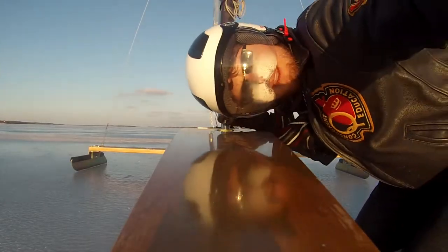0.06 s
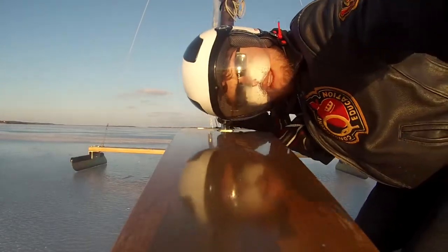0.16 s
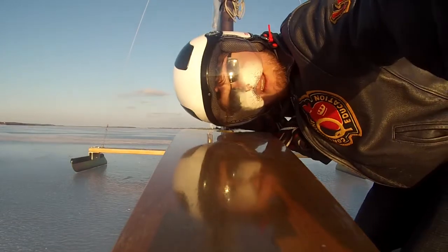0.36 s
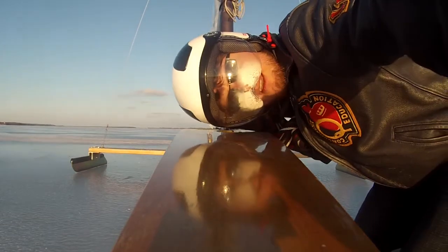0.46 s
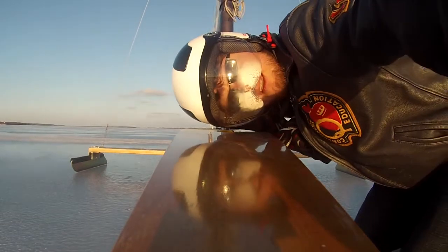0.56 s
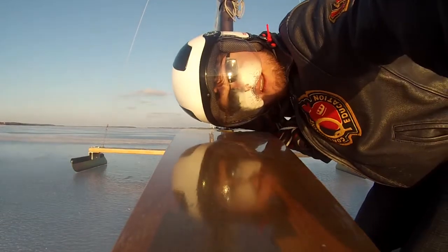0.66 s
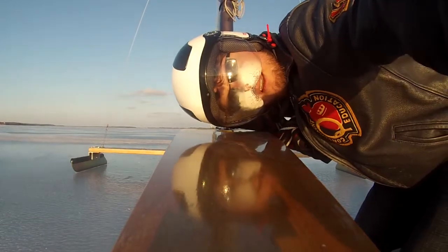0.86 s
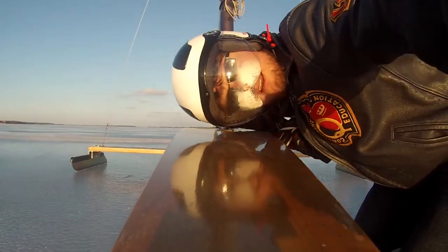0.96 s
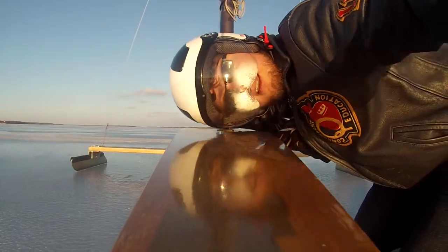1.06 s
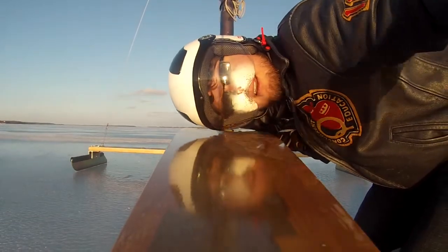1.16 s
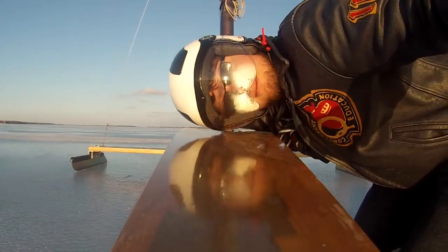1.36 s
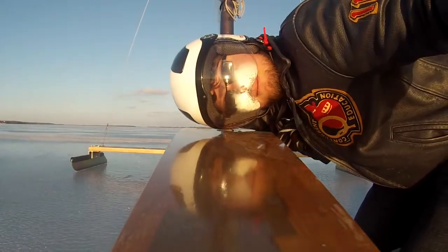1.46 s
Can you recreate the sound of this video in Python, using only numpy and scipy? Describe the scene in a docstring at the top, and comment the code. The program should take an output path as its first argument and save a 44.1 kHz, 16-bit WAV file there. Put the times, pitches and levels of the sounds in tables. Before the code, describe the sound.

Close to the deck of an ice boat on a frozen lake, a sharp knock sets the hull booming. Something slides in brief scrapes, then a second knock lands, over a low, uneven wind rumble and faint hiss.

```python
"""Ice boat on a frozen lake

Handling gives two sharp knocks that set the hollow hull booming in its lowest modes.
Something slides on the boat in a few short scrapes, each a dense train of frictional slips.
A low hull rumble, stirred by wind and a scrape, swells and fades under a faint, flickering hiss."""
import sys
import numpy as np
from scipy import signal
from scipy.fft import rfft, irfft, next_fast_len
from scipy.io import wavfile
from scipy.ndimage import uniform_filter1d, map_coordinates

SR = 44100
rng = np.random.default_rng(int(sys.argv[2]) if len(sys.argv) > 2 else 0)


def log_audio(samples):
    """Write samples as a 16-bit WAV file to the path given in sys.argv[1]."""
    # one column per channel
    frames = np.atleast_2d(samples).T
    # limit to full scale, then quantise
    limited = np.clip(frames, -1, 1)
    pcm = np.round(limited * 32767).astype(np.int16)
    wavfile.write(sys.argv[1], SR, pcm)


N = 66150


def amp(db):
    """Decibel scale: a level as an amplitude ratio."""
    return 10 ** (np.asarray(db) / 20)


def unit(x):
    """Normalisation to rms 1."""
    return x / np.sqrt(np.mean(x ** 2) + 1e-20)


def since(s):
    """Causality: seconds since a moment, zero before it."""
    return np.maximum(np.arange(N) / SR - s, 0)


def along(points, hz):
    """Interpolation of (frequency [Hz], value) points on a log frequency axis."""
    f, v = np.transpose(points)
    return np.interp(np.log(hz + 1), np.log(f + 1), v)


def wobble(rate):
    """Random modulation: a smooth curve with rate knots a second."""
    return map_coordinates(rng.standard_normal(int(N * rate / SR) + 4), [np.arange(N) * rate / SR])


def filtered(x, response):
    """Linear filtering: the spectrum of x times a frequency response."""
    m = next_fast_len(N + SR // 2)
    return irfft(rfft(x, m) * response(np.fft.rfftfreq(m, 1 / SR)), m)[:N]


def noise(spectrum):
    """Spectral shaping: coloured noise of rms 1."""
    return unit(filtered(rng.standard_normal(N), lambda hz: amp(along(spectrum, hz))))


def ring(t, hz, t60, rise):
    """Damped oscillation of one mode."""
    return np.sin(2 * np.pi * hz * t) * amp(-60 * t / t60) * (1 - np.exp(-t / rise))


def scrapes():
    """Stick-slip friction: dense random impulses drive the resonances of the rubbed part."""
    # (start [s], length [s], level [dB], fade over the stroke [dB], tilt [dB/octave], grit [dB],
    #  release T60 [s])
    strokes = [(0.0, 0.013, -45.5, 2.5, -6.5, -14, 0.16), (0.201, 0.07, -31.5, 6, 0.5, -8, 0.15),
               (0.276, .035, -40.5, 2.5, -0.5, -4, 0.26), (0.376, 0.086, -45.5, -0.5, -2, -9.5, 0.14),
               (0.515, 0.067, -39.5, -1, -3.5, -5, 0.12), (0.985, .053, -23, 7.5, 0, -5, 0.038)]
    # resonances of the rubbed part (frequency [Hz], bandwidth [Hz], peak gain [dB])
    modes = [(846, 59, -13.5), (1490, 330, -4.5), (1970, 205, 3.5), (2330, 200, -1.5), (3200, 230, -18.5),
             (3540, 164, -13), (4880, 110, -11), (6410, 450, -26)]
    # broadband friction noise (frequency [Hz], relative level [dB])
    grit_spectrum = [(100, 9), (400, -3), (1100, -1), (3000, 3.5), (4500, -4.5), (6500, -9.5),
                     (7600, -22.5), (10000, -20), (12000, -64)]
    rise_s, slips_per_s, slip_scatter, roughness_db = 0.012, 9000, 0.35, 0.7

    def resonances(f):
        """Damped resonators add with alternating polarity."""
        return sum((-1) ** k * amp(db) * 1j * f * width / (hz * hz - f * f + 1j * f * width)
                   for k, (hz, width, db) in enumerate(modes))

    out = np.zeros(N)
    for start, length, db, fade_db, tilt, grit_db, release_t60 in strokes:
        t = since(start)
        slips = (rng.random(N) < slips_per_s / SR) * rng.choice([-1, 1], N)
        strengths = np.exp(slip_scatter * rng.standard_normal(N))
        rub = unit(filtered(slips * strengths, resonances)) + amp(grit_db) * noise(grit_spectrum)
        rub = unit(filtered(rub, lambda hz: amp(tilt * np.log2(np.maximum(hz, 200)))))
        stroke_db = db - fade_db * np.minimum(t / length, 1)
        release_db = -60 * since(start + length) / release_t60
        level_db = stroke_db + release_db + roughness_db * wobble(130)
        out += rub * amp(level_db) * (1 - np.exp(-t / rise_s))
    return out


def rumble_and_air():
    """Forced vibration: wind and a scrape stir a low hull rumble under a nearly steady hiss of air."""
    # swelling and fading of the rumble (time [s], level [dB])
    rumble_swells = [(0, -33.5), (0.109, -41.5), (0.179, -30.5), (.3, -24.5), (.36, -35.5), (.4, -25.5),
                     (.49, -31.5), (0.539, -24), (.6, -23), (0.649, -34.5), (0.709, -28), (0.851, -39),
                     (.96, -32.5), (1.15, -33), (1.331, -38), (1.44, -40.5), (1.5, -27.5)]
    # hull rumble, peaking at the lowest resonance (frequency [Hz], relative level [dB])
    rumble_spectrum = [(10, -25), (25, -2), (38, 0.5), (53, 8.5), (64, -7), (85, -12.5), (110, -28.5),
                       (133, -24), (170, -28), (260, -42.5), (500, -69)]
    # moving air (frequency [Hz], relative level [dB])
    air_spectrum = [(30, 7.5), (200, 2), (350, 3), (600, -3), (850, -2.5), (1050, -12), (1350, 3),
                    (1650, 1.5), (2000, -6), (3000, -13), (4000, -18.5), (6000, -18.5), (7500, -24),
                    (11500, -27.5), (12300, -49)]
    air_db, sway_db, flutter_db = -55.5, -0.22, 0.74
    rumble = noise(rumble_spectrum)
    # dividing by the running rms leaves the swells to set the level
    running_rms = np.sqrt(np.abs(uniform_filter1d(rumble ** 2, size=2600)) + 1e-6)
    swell_gain = amp(np.interp(since(0), *np.transpose(rumble_swells)))
    hiss = amp(air_db + sway_db * wobble(4) + flutter_db * wobble(33)) * noise(air_spectrum)
    return swell_gain * rumble / running_rms + hiss


def treble_flicker():
    """Amplitude modulation: brief Gaussian swells make a very faint treble hiss come and go."""
    # treble hiss (frequency [Hz], relative level [dB])
    hiss_spectrum = [(1500, -44), (3000, 6), (4500, -10.5), (6000, 0), (7500, -12.5), (9500, 2),
                     (10700, -27), (11600, 1), (12300, -40)]
    # peaks of the swells (time [s], level [dB])
    swells = [(0.074, -67), (.17, -68.5), (.68, -65), (.775, -64.5), (0.804, -65.5), (.88, -65.5),
              (1.07, -66), (1.18, -68), (1.28, -66), (1.309, -65), (1.37, -66)]
    width_s = 0.012
    t = since(0)
    envelope = sum(amp(db) * np.exp(-((t - peak) / width_s) ** 2) for peak, db in swells)
    return envelope * noise(hiss_spectrum)


def knocks():
    """Impact excitation: each contact gives a click of damped modes, a noisy crack and a hollow ring."""
    # the first knock strikes twice in quick succession; the last contact is a scrape coming to a stop
    # (time [s], click [dB], pitch [ratio], rise [s], tilt [dB/octave], crack [dB], hollow ring [dB])
    contacts = [(0.2032, 6, 0.98, 0.00031, -1, -14, -52), (0.2046, 0.5, 0.99, 0.00023, -1.5, -15.5, -62),
                (0.9859, 2.5, 0.99, 0.0013, 5.5, -24.5, -20), (1.039, -12, 0.86, 0.0011, 0, -43, -44)]
    # modes of the struck part (frequency [Hz], relative level [dB], T60 [s])
    modes = [(1669, -6, 0.0082), (1766, -6, 0.014), (2257, -5, 0.008), (2830, -21.5, 0.01),
             (3390, -18.5, 0.0044), (4760, -17, 0.0039)]
    # impact noise (frequency [Hz], relative level [dB])
    crack_spectrum = [(200, -18), (1000, 7), (2200, 9.5), (3500, 2), (6000, -4.5), (7500, -47),
                      (10000, -11.5), (12000, -54)]
    crack_t60_s, hollow_hz, hollow_t60_s = 0.012, 860, 0.029
    lowest_hz = modes[0][0]
    out = np.zeros(N)
    for start, click_db, pitch, rise, tilt, crack_db, hollow_db in contacts:
        t = since(start)
        click = sum(amp(db + tilt * np.log2(hz / lowest_hz)) * ring(t, hz * pitch, t60, rise)
                    for hz, db, t60 in modes)
        out -= amp(click_db) * click
        out += amp(crack_db - 60 * t / crack_t60_s) * (t > 0) * noise(crack_spectrum)
        out += amp(hollow_db) * ring(t, hollow_hz, hollow_t60_s, rise)
    return out


def hull_boom():
    """Free vibration: a blow pushes the deck once, and the hull rings on in its two lowest modes."""
    # blows to the hull (time [s], thud [dB], boom [dB], boom T60 [s], overtone [dB])
    blows = [(0.204, -8, -13, 0.59, -20), (0.9865, -40, -6, 0.23, -35), (1.0423, -35, -28, 1, -33)]
    thud_s, boom_hz, rise_s = 0.0041, 54.78, 0.0048
    overtone_hz, overtone_t60_s = 134.3, 0.29
    out = np.zeros(N)
    for start, thud_db, boom_db, boom_t60, overtone_db in blows:
        t = since(start)
        out += amp(thud_db) * np.sin(np.pi * np.minimum(t / thud_s, 1)) ** 2
        out += amp(boom_db) * ring(t, boom_hz, boom_t60, rise_s)
        out += amp(overtone_db) * ring(t, overtone_hz, overtone_t60_s, rise_s)
    return out


def scene():
    """Superposition: all the sounds add together."""
    return (scrapes() + rumble_and_air() + treble_flicker() + knocks() + hull_boom())[None]


def record(dry):
    """Band limiting and saturation: the microphone sheds deep bass and top treble; loud peaks flatten."""
    bottom_hz, top_hz, ceiling = 15, 12100, 0.93
    highpass = signal.butter(1, bottom_hz, "highpass", fs=SR, output="sos")
    lowpass = signal.ellip(10, rp=0.1, rs=70, Wn=top_hz, fs=SR, output="sos")
    saturated = np.clip(signal.sosfilt(highpass, dry), -ceiling, ceiling)
    return signal.sosfilt(lowpass, saturated)


dry = scene()
out = record(dry)
log_audio(out)
```